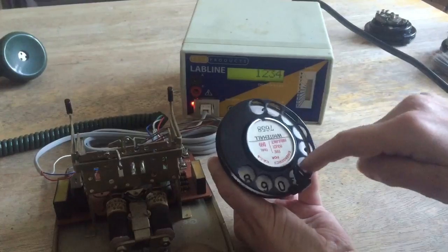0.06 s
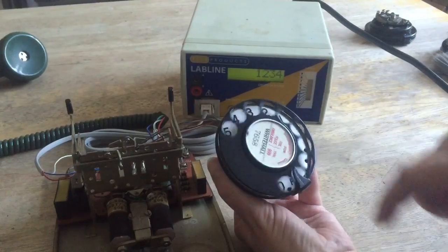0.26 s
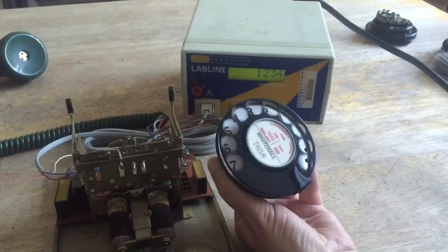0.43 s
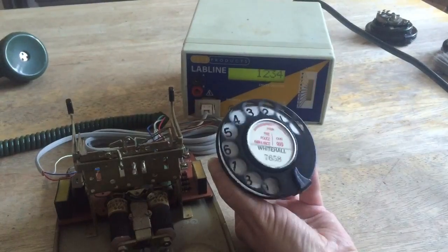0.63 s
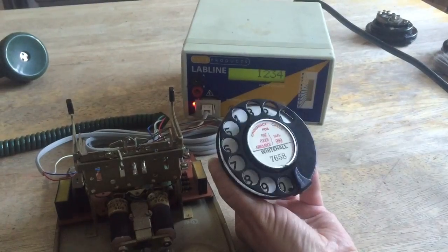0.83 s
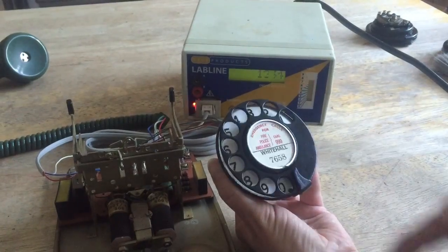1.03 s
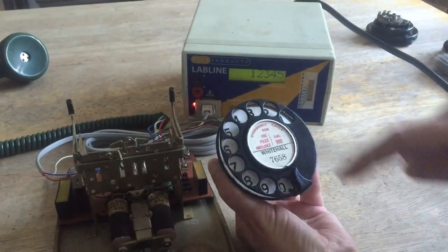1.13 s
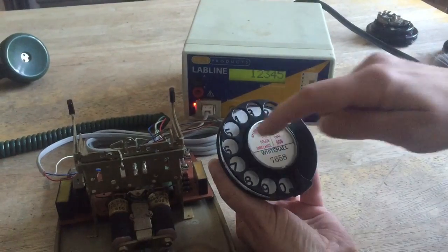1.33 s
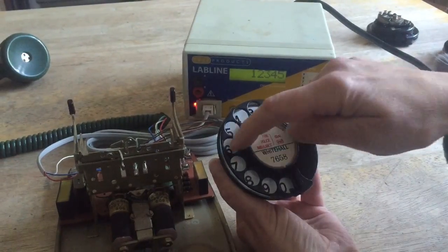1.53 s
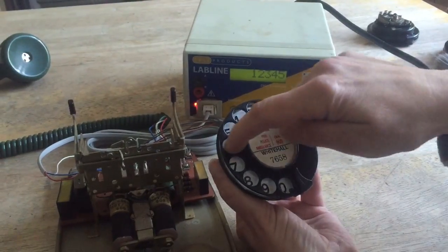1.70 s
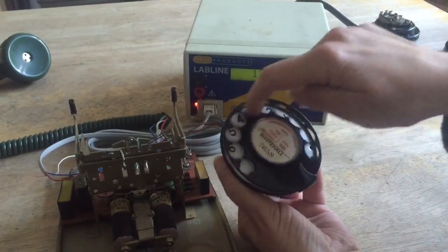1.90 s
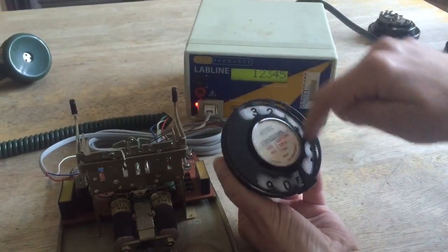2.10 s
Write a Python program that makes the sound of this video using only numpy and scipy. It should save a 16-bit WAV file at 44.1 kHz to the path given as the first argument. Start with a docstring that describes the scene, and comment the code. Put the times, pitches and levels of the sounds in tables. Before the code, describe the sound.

A rotary telephone dial, heard close, gives a small click at 0.1 seconds, then spins back with a fast, bright rattling whir from 0.2. It stops at 0.8 with a sharp, briefly ringing metallic clack, the loudest moment. Only faint room hum remains until soft scraping at 1.7. A finger taps the dial at 1.85 and starts winding it, with light scrapes and ticks until about 2.2.

```python
"""A rattling whir: a hand-held rotary telephone dial runs back, its governor ticking on every turn,
until the finger wheel clacks against its stop. After a pause a finger taps into the next hole and
starts to wind the dial, which scrapes and ticks. All these contacts ring the same metal dial,
in a small quiet room with a mains hum."""
import sys
import numpy as np
from scipy import signal
from scipy.fft import rfft, irfft, next_fast_len
from scipy.io import wavfile
from scipy.ndimage import map_coordinates

SR = 44100
rng = np.random.default_rng(int(sys.argv[2]) if len(sys.argv) > 2 else 0)


def dump(signal):
    """Clip the signal to [-1, 1] and save it as 16-bit WAV at the path in sys.argv[1]."""
    limited = np.clip(np.atleast_2d(signal).T, -1, 1)
    pcm = np.round(limited * 32767).astype(np.int16)
    wavfile.write(sys.argv[1], SR, pcm)


N = 94815
T = np.arange(N) / SR
FFT_SIZE = next_fast_len(N + SR // 2, real=True)
HZ = np.fft.rfftfreq(FFT_SIZE, 1 / SR)


# Each row: time in seconds, speed in turns per second.
GOVERNOR_SPEED = [(.178, 47), (.224, 75), (.24, 77.7), (.35, 77.5), (.39, 72.5), (.64, 73.3), (.67, 69.5),
                  (.76, 70.5), (.826, 63.5)]

def governor_blows(scatter_db=0.7, rebound_s=0.005, rebound_db=-5.5, fade_db_per_s=11):
    """One blow per turn, then a rebound that weakens as the spring runs down."""
    times, speed = np.transpose(GOVERNOR_SPEED)
    turns = np.cumsum(np.interp(T, times, speed, left=0, right=0)) / SR
    starts = T[np.searchsorted(turns, np.arange(int(turns[-1]) + 1), side="right")]
    blows = np.zeros(N)
    for start in starts:
        blow_db, bounce_db = rng.standard_normal(2) * [scatter_db, 2 * scatter_db]
        jitter_s, bounce_jitter_s = rng.standard_normal(2) * [.0002, .0005]
        bounce_db += rebound_db - fade_db_per_s * (start - times[0])
        blows[round((start + jitter_s) * SR)] += amp(blow_db)
        blows[round((start + rebound_s + bounce_jitter_s) * SR)] += amp(bounce_db)
    return blows


def unit_running(x):
    """Scale to rms 1 over the governor's run."""
    running = (T > GOVERNOR_SPEED[0][0]) & (T < GOVERNOR_SPEED[-1][0])
    return x / np.sqrt(np.mean(x[running] ** 2))


# Each row: time in seconds, then body, treble and top levels in dB.
WHIR_LEVELS = [(.11, -72, -95, -120), (0.168, -53.5, -69, -99), (.187, -56.5, -66, -91),
               (0.201, -50.5, -62, -93), (.214, -49, -57, -91), (0.226, -51.5, -54.5, -61),
               (.31, -47.5, -50.5, -59), (0.379, -46.5, -53, -57.5), (0.458, -48.5, -52.5, -57.5),
               (.56, -47.5, -50.5, -56), (.66, -48.5, -51, -55.5), (.755, -49, -49, -54.5),
               (0.792, -53.5, -51.5, -59), (0.829, -44.5, -55, -53)]
# Each row: frequency in Hz, gain of the mechanism's contacts in dB.
MECHANISM_EQ = [(200, -23), (650, -18.5), (950, -6), (1300, 0), (1500, -5.5), (2500, -2), (3000, -15.5),
                (3300, 3), (3700, 1), (4400, 6.5), (8000, 2), (10500, 10.5), (13000, 4.5), (17000, 6)]

def governor_whir(rise_s=0.0016, fall_s=0.0019, gear_rub_db=-12, push_s=0.001536, push_db=-13.5):
    """Gritty ticks over steady gear rub ring the dial; a faint mid-tick push adds to its body."""
    blows = governor_blows()
    t = T[:SR // 50]
    tick = (1 - np.exp(-(t / rise_s) ** 2)) * np.exp(-t / fall_s)
    ticks = signal.fftconvolve(blows, tick / tick.max())[:N]
    rattle = grit() * unit_running(ticks + amp(gear_rub_db))
    push = unit_running(np.roll(blows, round(push_s * SR)))
    body_force = unit_running(rattle + amp(push_db) * push)
    thud, body, treble, top = dial_bands(MECHANISM_EQ)
    drives = zip([body_force, rattle, rattle], gains(WHIR_LEVELS), [thud + body, treble, top])
    whir = sum(filtered(force * gain, unit(causal(band))) for force, gain, band in drives)
    return whir + governor_rings(rattle)


# Early ping and mid-travel ring. Each row: time in seconds, level in dB.
PING_LEVELS = [(.212, -85), (.222, -57.5), (.36, -56), (.385, -81)]
RING_LEVELS = [(.4, -78), (.47, -59), (.56, -53.5), (.66, -57), (.74, -69)]

def governor_rings(rattle):
    """The rattle excites two high resonances."""
    rings = np.zeros(N)
    for levels, hz, width_hz in [(PING_LEVELS, 12350, 750), (RING_LEVELS, 5900, 260)]:
        force = unit_running(rattle ** 2) * grit() * gains(levels)[0]
        resonance = unit(1 / (1 + 1j * (HZ - hz) / width_hz) ** 2)
        rings += filtered(force, resonance)
    return rings


# Each row: start in seconds, strength in dB, thud, treble and top trims in dB, chatter in seconds.
STOP_HITS = [(.822, -13.5, 20, 2, -8, 0.005), (.8311, 3.5, -4.5, -0.5, -5.5, 0.0029),
             (.8343, 0.5, -1.5, 7, -8, 0.0011), (.838, 3, 1.5, -0.5, -8, 0.0012)]
# Each row: frequency in Hz, gain in dB.
STOP_EQ = [(200, -14), (650, -23), (900, -1), (1250, -10), (1560, 1.5), (1720, -4), (1865, 2), (2000, -1),
           (2200, -17), (3100, -17), (4400, -3), (6000, -1), (8300, -1.5), (12000, 0), (17000, -3)]

def wheel_stop():
    """The finger wheel meets its stop in a quick cluster of hits."""
    return strikes(STOP_HITS, STOP_EQ, chatter_db=-4, snap_db=-8)


# Each row: start in seconds, strength in dB, thud, treble and top trims in dB, chatter in seconds.
FINGER_HITS = [(1.8524, -15, -5, 1.5, 7, 0.0022), (1.8887, -34, 2, 6.5, 16.5, 0.0011),
               (1.939, -32, -2, -30, 0, 0.006), (1.9575, -25.5, -10, -14.5, 12, 0.0018),
               (1.973, -29, -3, -24, 2, .003), (1.985, -26, -3, -9.5, -4, 0.0022),
               (1.993, -24, -17, -9.5, 7, 0.0028), (2.022, -28, -6, -18, -12, 0.0041),
               (2.057, -22, -15, -19, -13, 0.005), (2.086, -28, -33, -24, -3, 0.0031),
               (2.112, -25, -4, -22, -1, 0.0011), (2.133, -20, 2, -19, 15, 0.0048),
               (2.141, -31, 9, -8, 3, 0.0048)]
# Each row: frequency in Hz, gain in dB.
FINGER_EQ = [(200, -15), (700, -8.5), (885, 11), (1020, -15), (1200, -2.5), (1550, 8.5), (1850, 9.5),
             (2200, -1), (3100, -3.5), (4200, -2), (6000, 14.5), (8200, 8.5), (9300, -4), (16000, -18)]

def finger_knocks():
    """Finger and hand knock the dial."""
    return strikes(FINGER_HITS, FINGER_EQ, chatter_db=-2, snap_db=-10)


# Each row: time in seconds, body level in dB, treble level in dB.
SCRAPE_LEVELS = [(1.68, -87, -100), (1.725, -63.5, -90), (1.755, -90, -100), (1.79, -77, -88),
                 (1.869, -64.5, -68.5), (1.92, -76, -98), (1.96, -56, -70.5), (2.015, -66, -70.5),
                 (2.06, -64, -66.5), (2.11, -62.5, -60.5), (2.15, -47.5, -60.5)]
# Each row: frequency in Hz, gain in dB.
SCRAPE_EQ = [(200, -12), (700, -14), (885, -1), (1200, -3), (1800, 11), (2300, -6), (3700, 5.5), (4750, 25),
             (5500, 9.5), (6200, 2.5), (7100, -7), (8000, -2), (9000, -11), (11000, -17), (16000, -20)]

def winding_scrape(rough_db=3, grains_hz=260):
    """Finger and spring rub unevenly as the wheel is brushed, then pulled round."""
    roughness = map_coordinates(rng.standard_normal(N), [T * grains_hz], order=1)
    force = unit(grit() * amp(rough_db * roughness))
    thud, body, treble, top = dial_bands(SCRAPE_EQ)
    drives = zip(gains(SCRAPE_LEVELS), [thud + body, treble + top])
    return sum(filtered(force * gain, unit(causal(band))) for gain, band in drives)


# Each row: start in seconds, strength in dB, thud, treble and top trims in dB, chatter in seconds.
SLACK_HITS = [(.0978, -13, 9, -3.5, -28, 0.0013), (.347, -23, 23, -1, 5, .003)]

def slack_clicks():
    """The mechanism takes up its play."""
    return strikes(SLACK_HITS, MECHANISM_EQ, chatter_db=-3, snap_db=-10)


def strikes(hits, eq, chatter_db, snap_db, firm_s=0.0027):
    """A push with some chatter rings the body; the treble is chatter with a small snap."""
    forces = np.zeros((4, N + SR))
    t = T[:SR // 25]
    push = signal.unit_impulse(len(t), SR // 2000)
    for start_s, db, thud_db, treble_db, top_db, chatter_s in hits:
        chatter = np.sign(rng.standard_normal(len(t))) * t * np.exp(-2 * t / chatter_s)
        chatter /= np.linalg.norm(chatter)
        softening = np.hypot(1, (chatter_s / firm_s) ** 2)  # long chatter weakens the push
        blow = push / softening + amp(chatter_db) * chatter
        crack = amp(treble_db) * (chatter + amp(snap_db) * push)
        by_band = np.array([amp(thud_db) * blow, blow, crack, amp(top_db) * crack])
        onset = round(start_s * SR)
        forces[:, onset:onset + len(t)] += amp(db) * by_band
    return sum(filtered(force[:N], causal(band)) for force, band in zip(forces, dial_bands(eq)))


# Each row: resonance in Hz, width in Hz, gain in dB.
DIAL_MODES = [(913.4, 16.7, -1.5), (1185, 215, -4), (1560, 110, -58), (1785, 16.7, 7.5), (1853, 35, 1.5),
              (1952, 76, 5.5), (2128, 134, 9), (2582, 87, 0.5), (3575, 78, -5.5), (5020, 1170, -23),
              (5820, 324, -11.5), (6340, 214, -7.5), (6830, 1100, -10), (7950, 570, -7), (8000, 490, -6.5),
              (9110, 140, -3.5), (11540, 900, -15), (11820, 1600, -12)]

def dial_bands(eq, edges_hz=(1380, 3050, 8860)):
    """The metal dial's response to one kind of contact, split into thud, body, treble and top."""
    modes = sum(amp(db) * 1j * HZ * width / (hz * hz - HZ ** 2 + 1j * HZ * width)
                for hz, width, db in DIAL_MODES)
    response = np.abs(modes) * amp(log_interp(eq, HZ))
    lowpasses = [1 / (1 + (HZ / hz) ** 20) for hz in edges_hz]
    return response * np.diff(lowpasses, axis=0, prepend=0, append=1)


# Each row: time in seconds, level in dB.
RUMBLE_LEVELS = [(0, -75), (.1, -64.5), (.2, -78), (.32, -67), (.55, -79.5), (.72, -66.5), (.83, -75.5),
                 (.92, -64.5), (1, -85.5), (1.8, -78.5), (1.95, -67), (2.15, -72)]
# Each row: frequency in Hz, gain in dB.
RUMBLE_EQ = [(20, -58), (50, -7), (110, -7.5), (170, -9.5), (240, -14.5), (400, -28), (1500, -62)]

def hand_rumble():
    """The dial rumbles faintly as it moves in the hand."""
    return gains(RUMBLE_LEVELS)[0] * shaped_noise(RUMBLE_EQ)


# Each row: frequency in Hz, time to decay by 60 dB in seconds.
ROOM_T60 = [(200, 0.14), (1800, 0.3), (6000, 0.2), (14000, 0.13)]

def room_echoes(x, tail_db=-16.5, build_s=.009, table_db=-15, table_s=0.0093, dull_hz=5000):
    """Quick, duller scatter off things on the table, then the room's short tail."""
    hz, frame_s, noise = signal.stft(rng.standard_normal(SR // 2), SR, nperseg=256)
    decay = amp(-60 * frame_s / log_interp(ROOM_T60, hz)[:, None])
    tail = signal.istft(noise * decay, SR, nperseg=256)[1]
    t = T[:len(tail)]
    tail *= 1 - np.exp(-(t / build_s) ** 2)
    scatter = rng.standard_normal(len(t)) * t * np.exp(-t / table_s)
    walls = rfft(tail / np.linalg.norm(tail), FFT_SIZE)
    table = rfft(scatter / np.linalg.norm(scatter), FFT_SIZE) / (1 + 1j * HZ / dull_hz)
    return filtered(x, amp(tail_db) * walls + amp(table_db) * table)


# Each row: frequency in Hz, relative noise density in dB.
AIR_EQ = [(15, -42), (25, -26), (69, -13.5), (85, -0.5), (103, -0.5), (241, -9.5), (284, -13.5),
          (661, -18.5), (757, -20.5), (1020, -20.5), (1110, -20), (1200, -21), (1500, -21), (2520, -23),
          (17000, -35.5)]
# Each row: frequency in Hz, rms level in dB.
HUM_TONES = [(100.2, -71.5), (1031, -83.5)]

def room_tone(air_db=-67.5):
    """Low room noise, mains hum and a faint whine."""
    tones = sum(amp(db) * np.sqrt(2) * np.sin(2 * np.pi * hz * T) for hz, db in HUM_TONES)
    return amp(air_db) * shaped_noise(AIR_EQ) + tones


def grit():
    """Tiny contacts, even in size and random in direction."""
    return np.sign(rng.standard_normal(N))


def shaped_noise(eq):
    """Coloured noise at rms 1."""
    return unit(filtered(rng.standard_normal(N), amp(log_interp(eq, HZ))))


def amp(db):
    """Decibels to gain."""
    return 10 ** (np.asarray(db) / 20)


def unit(x):
    """Scale to rms 1."""
    return x / np.sqrt(np.mean(np.abs(x) ** 2) + 1e-20)


def gains(rows):
    """One gain per sample for each dB column."""
    times, *columns = np.transpose(rows)
    return [amp(np.interp(T, times, db, left=-120, right=-120)) for db in columns]


def log_interp(points, hz):
    """Interpolate (Hz, value) points on a log frequency axis."""
    point_hz, values = np.transpose(points)
    return np.interp(np.log(hz + 1), np.log(point_hz + 1), values)


def filtered(x, response):
    """Apply a response on the HZ grid."""
    return irfft(rfft(x, FFT_SIZE) * response, FFT_SIZE)[:N]


def causal(gain):
    """Minimum-phase response: rings only after a blow."""
    cepstrum = irfft(np.log(np.maximum(gain, 1e-6)), FFT_SIZE)
    cepstrum[1:FFT_SIZE // 2] *= 2
    cepstrum[FFT_SIZE // 2 + 1:] = 0
    return np.exp(rfft(cepstrum))


def scene():
    """The dial and the room around it, in mono."""
    hits = wheel_stop() + finger_knocks() + slack_clicks()
    direct = hits + governor_whir() + winding_scrape()
    return (direct + room_echoes(direct) + hand_rumble() + room_tone())[None]


def record(dry):
    """Brick-wall low-pass."""
    cutoff_hz = 17250
    return np.array([filtered(channel, HZ < cutoff_hz) for channel in dry])


dry = scene()
out = record(dry)
dump(out)
```